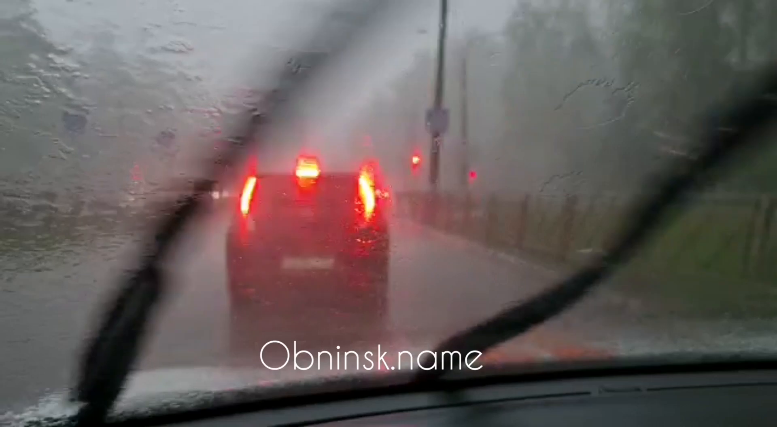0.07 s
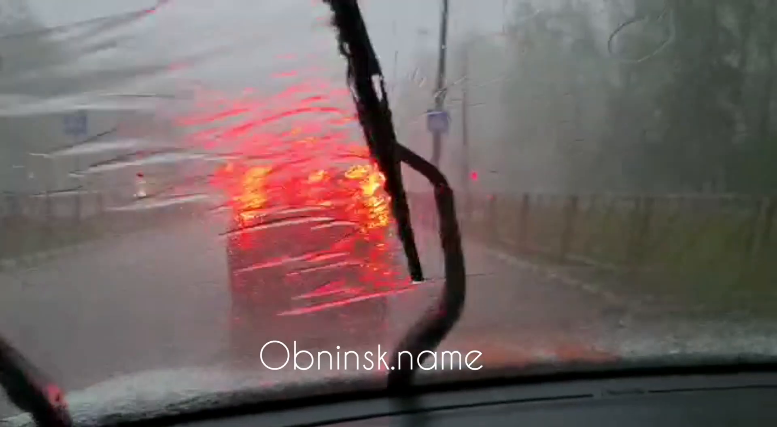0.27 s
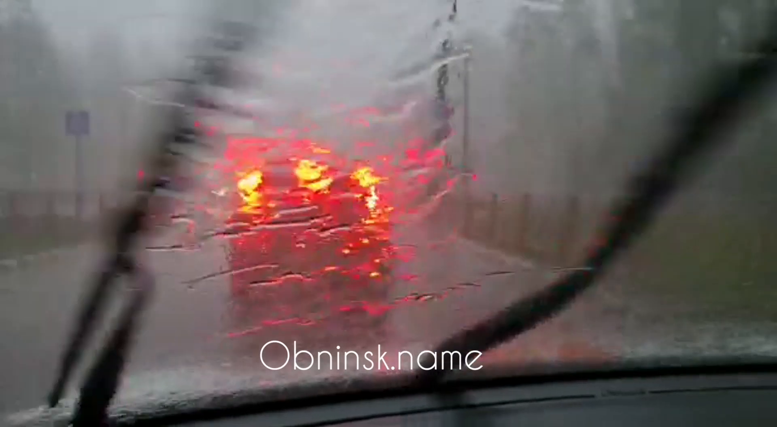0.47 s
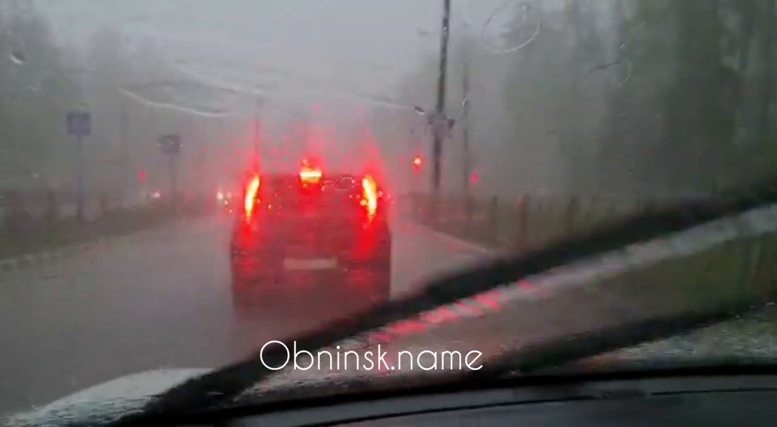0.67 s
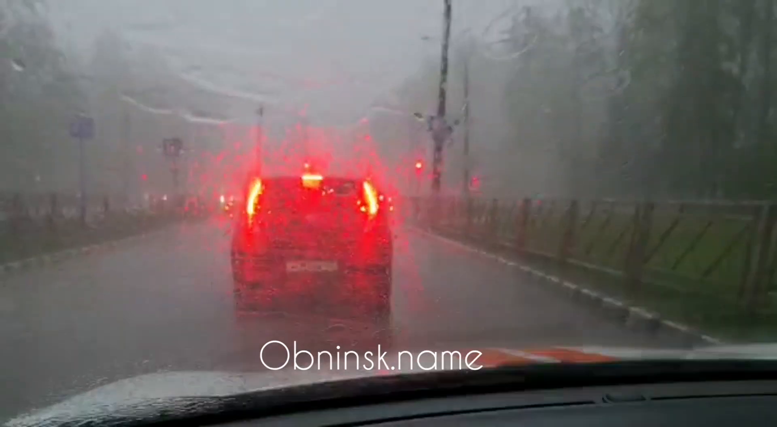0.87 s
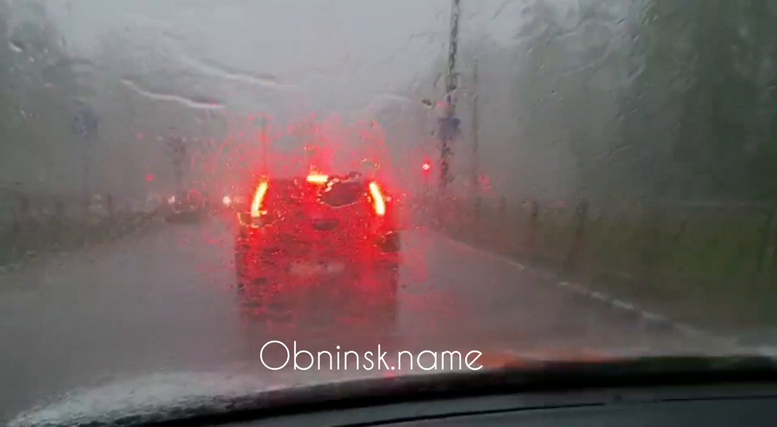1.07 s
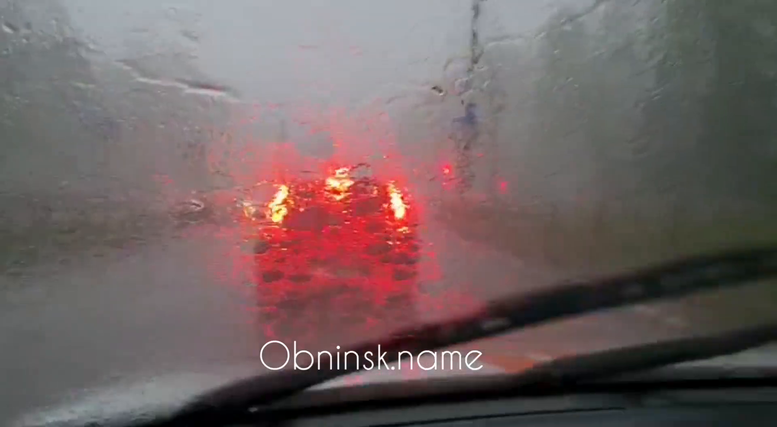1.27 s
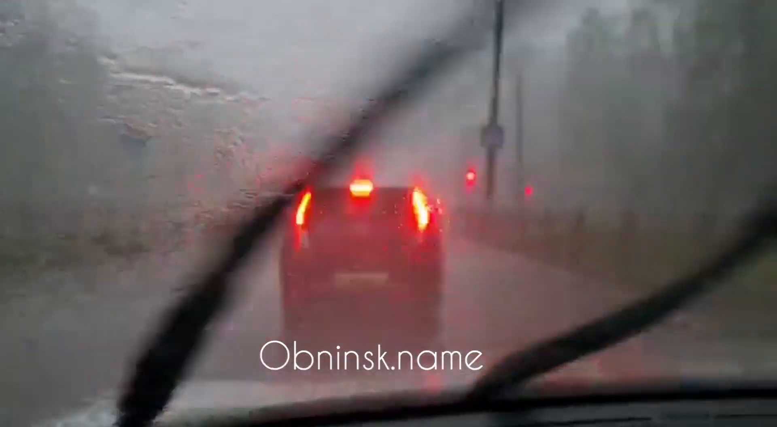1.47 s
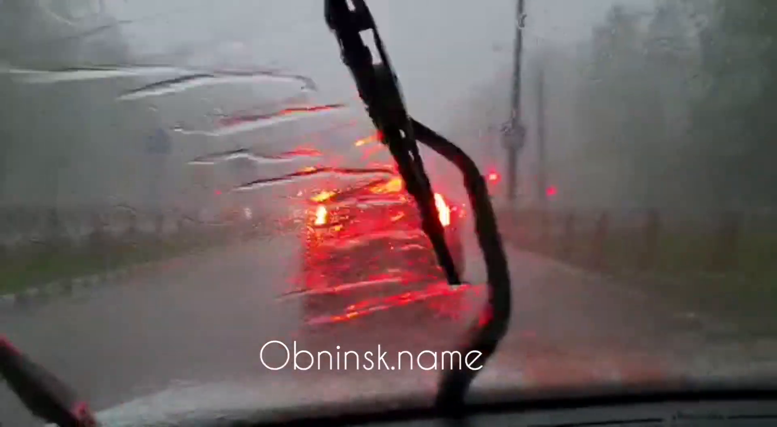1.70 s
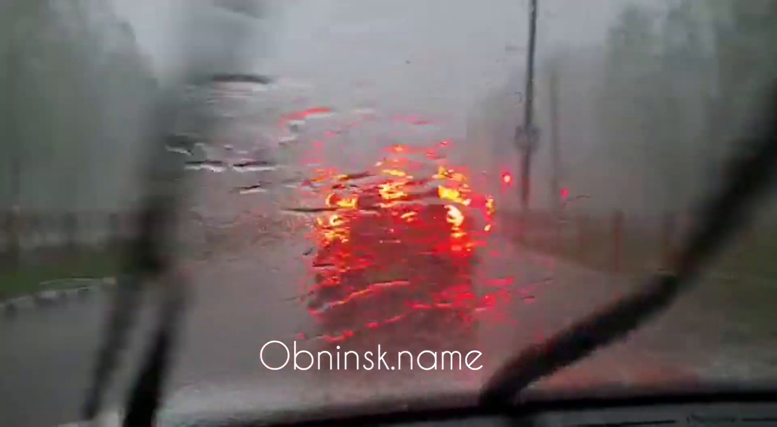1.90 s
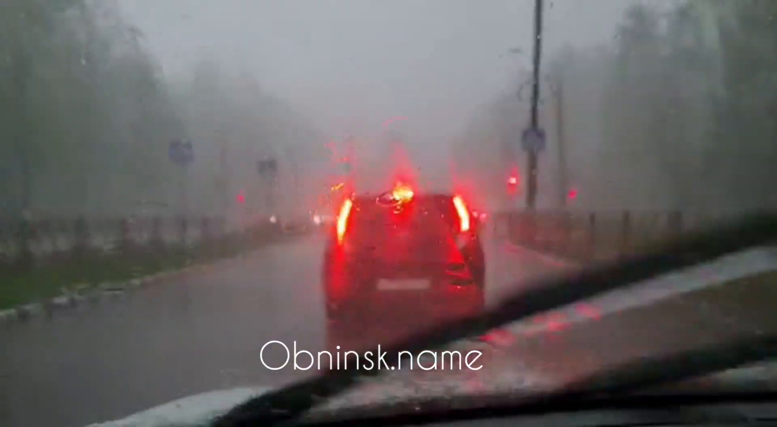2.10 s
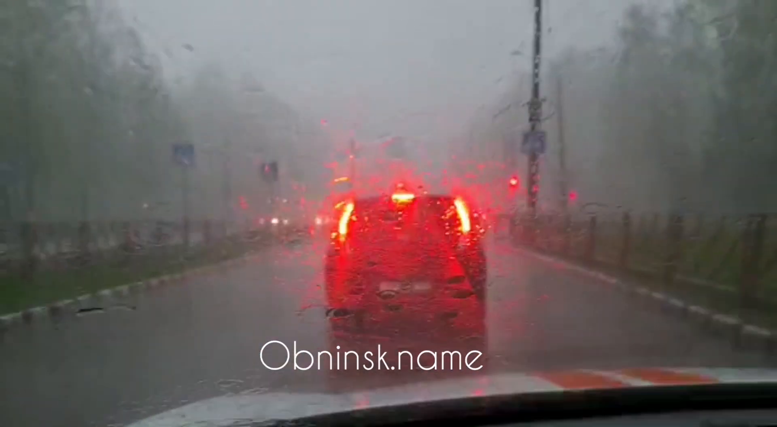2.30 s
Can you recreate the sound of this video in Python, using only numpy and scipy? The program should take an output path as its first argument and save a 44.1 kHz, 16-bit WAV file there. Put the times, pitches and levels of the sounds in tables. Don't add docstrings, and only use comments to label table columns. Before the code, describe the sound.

Rain pounds a car's roof and glass in uneven gusts, strong at first, easing before one second, then swelling again; wipers thump dully over a low idle, captured by two spaced microphones in the cabin.

```python
import sys
import numpy as np
from scipy import signal
from scipy.fft import rfft, irfft, next_fast_len
from scipy.io import wavfile
from scipy.ndimage import uniform_filter1d

SR = 44100
rng = np.random.default_rng(int(sys.argv[2]) if len(sys.argv) > 2 else 0)


def to_wav(s):
    ch = np.atleast_2d(s).T
    pcm = np.round(np.clip(ch, -1, 1) * 32767)
    wavfile.write(sys.argv[1], SR, pcm.astype(np.int16))


def elevation(decibels):
    levels = np.asarray(decibels, float)
    return 10 ** (levels / 20)


N = 103546
LONG = next_fast_len(N + 8000, True)

# start_s [s], roof_force_db [dB], glass_force_db [dB]
GUSTS = [(.07, -27.5, -34.5), (0.189, -28, -37), (.3, -25, -33.5), (.48, -24.5, -41), (.6, -29, -48),
         (0.649, -30, -52.5), (0.751, -35, -52), (.77, -36.5, -61), (.81, -32.5, -59.5), (.93, -42.5, -52),
         (1.019, -30, -34), (1.171, -27.5, -35.5), (1.449, -29.5, -36), (1.62, -31.5, -39), (1.9, -34, -38),
         (2.07, -34, -39.5), (2.199, -32.5, -39.5), (2.35, -36, -46)]
# pitch_hz [Hz], level_db [dB per Hz]
GLASS_TONE = [(400, -17.5), (1000, -6), (1600, 2.5), (2400, -8), (3300, -1), (5000, -11), (7500, -16.5),
              (15700, -21.5)]


def read(points, hz):
    point_hz, value = np.transpose(points)
    return np.interp(np.log(hz + 1), np.log(point_hz + 1), value)


def evened(x):
    return x / np.sqrt(np.mean(x ** 2) + 1e-20)


def through(spectra, tone):
    # pitch_hz [Hz], width_hz [Hz], lift_db [dB]
    panels = [(120.5, 16, 4), (180, 12, 6), (377.4, 48, 7.5), (563, 140, 3.5), (2854, 370, 4.5),
              (8890, 580, 5)]
    # pitch_hz [Hz], likeness [-1 to 1]
    likeness = [(60, 0.95), (180, 0.91), (400, 0.75), (700, -0.0095), (1400, 0.027), (3000, -0.068),
                (15000, 0.0083)]
    # pitch_hz [Hz], left_minus_right_db [dB]
    balance = [(60, -1), (170, 3), (350, 0), (700, -1.5), (1400, -1.6), (2800, -.4), (5500, -1.3),
               (10000, 1.3)]
    hz = np.fft.rfftfreq(LONG, 1 / SR)
    first, second = spectra
    lift_db = sum(db / (1 + ((hz - mid) / (width / 2)) ** 2) for mid, width, db in panels)
    same = np.clip(read(likeness, hz), -1, 1)
    lean = elevation(read(balance, hz) / 2)
    left = first * lean
    right = (same * first + np.sqrt(1 - same ** 2) * second) / lean
    gain = elevation(read(tone, hz) + lift_db) * (hz < 15800)
    return irfft(np.array([left, right]) * gain, LONG)[:, :N]


def rumble():
    # pitch_hz [Hz], level_db [dB per Hz]
    rumble_tone = [(15, -25), (33, 7), (50, 0.5), (120, 0), (200, -1.5), (400, -17), (1000, -60)]
    noise = rng.standard_normal((2, LONG))
    return elevation(-40.5) * evened(through(rfft(noise), rumble_tone))


def engine():
    # pitch_hz [Hz], level_db [dB rms]
    idle = [(23.6, -46), (47.2, -39.5), (71, -60), (94, -60)]
    slow = uniform_filter1d(rng.standard_normal((5, N)), 4000)
    slow = evened(uniform_filter1d(slow, 4000))
    turn_s = np.cumsum(1 + 0.029 * slow[0]) / SR
    lead = np.array([[0.36], [0]])
    total = np.zeros((2, N))
    for (hz, db), waver in zip(idle, slow[1:]):
        strength = np.sqrt(2) * elevation(db + 2.5 * waver)
        total += strength * np.sin(2 * np.pi * (hz * turn_s + rng.random()) + lead)
    return total


def wipers():
    # start_s [s], level_db [dB], pitch_hz [Hz]
    thumps = [(.105, -21, 175), (0.356, -21.5, 60), (0.443, -27.5, 180), (.52, -19, 49.6),
              (0.619, -25.5, 177.6), (1.055, -23.5, 101), (1.071, -22.5, 175), (1.529, -23.5, 172),
              (1.785, -24, 62), (1.79, -24.5, 172.6), (1.901, -26.5, 123), (1.949, -27.5, 50.7)]
    rise_s, t60_s = 0.015, 0.15
    t = np.arange(N) / SR
    total = np.zeros(N)
    for start_s, db, hz in thumps:
        age = np.maximum(t - start_s, 0)
        swell = elevation(db - 60 * age / t60_s) * (1 - np.exp(-age / rise_s))
        total += 2 * swell * np.sin(2 * np.pi * hz * age)
    return total


def splashes(snap_db, count, size=5000):
    # pitch_hz [Hz], t60_s [s]
    ringing = [(100, 0.27), (500, .12), (2000, 0.056), (6000, 0.037), (15000, 0.075)]
    snap_s, spread_s = 0.0015, 0.00048
    noise = rng.standard_normal((count, 2, 5000))
    hz, t, bands = signal.stft(noise, SR, nperseg=128)
    t60_s = np.maximum(read(ringing, hz), 0.005)[:, None]
    fading = bands * elevation(-60 * t / t60_s) / np.sqrt(t60_s)
    tail = signal.istft(fading, SR, nperseg=128)[1]
    age = np.arange(tail.shape[-1]) / SR
    snap = 1 + elevation(snap_db) * np.exp(-age / snap_s)
    sound = tail * snap * (1 - np.exp(-age / spread_s))
    return sound / np.linalg.norm(sound[..., :size], axis=-1, keepdims=True)


def big_drops():
    # start_s [s], peak_db [dB], dullness_db [dB]
    drops = [(.1016, -23, 0), (.154, -24, 0), (.1989, -25, 2), (.2354, -28, 4), (.5235, -25, 1),
             (.5975, -27, -2), (.6528, -31, 6), (.7103, -29, 5), (.7457, -33, 0), (.7772, -31, 0),
             (.819, -31, -2), (.8528, -35, 5), (.9422, -30, 2), (.9672, -31, 0), (.9858, -28, 2),
             (1.004, -25, -2), (1.0738, -21, 0), (1.17, -23, 0), (1.3482, -24, 1), (1.4815, -22, -2),
             (1.6851, -28, 2), (1.7539, -26, 0), (1.8348, -24, -3), (1.8665, -26, 0), (1.8785, -22, -4),
             (1.9218, -26, -8), (1.9565, -29, 10), (2.1365, -26, 0), (2.158, -24, -2), (2.1999, -23, -2)]
    bright, dull = np.zeros((2, 2, LONG))
    sounds = splashes(snap_db=12, count=len(drops), size=130)
    for (start_s, db, dull_db), sound in zip(drops, sounds):
        start = round(start_s * SR)
        at = slice(start, start + sound.shape[1])
        bright[:, at] += elevation(db) * sound
        dull[:, at] += elevation(db + dull_db) * sound
    low = signal.lfilter(*signal.butter(2, 4000, fs=SR), dull)
    high = signal.lfilter(*signal.butter(2, 4000, "high", fs=SR), bright)
    return elevation(32) * through(rfft(low + high), GLASS_TONE)


def patter(per_s, spread_db, tone, force_db):
    thinning = 0.6
    share = elevation(thinning * (force_db - force_db.max()))
    falls = rng.random(N) < share * per_s / SR
    size = elevation(spread_db * np.minimum(rng.exponential(1, N), 4))
    hits = size * falls / np.sqrt(share)
    spot = rng.integers(0, 12, N) == np.arange(12)[:, None]
    answers = rfft(splashes(snap_db=8.5, count=12), LONG)
    wet = (rfft(hits * spot, LONG)[:, None] * answers).sum(axis=0)
    return evened(through(wet, tone)) * elevation(force_db)


def glass_rain():
    start_s, _, glass_db = np.transpose(GUSTS)
    force_db = 7 + np.interp(np.arange(N) / SR, start_s, glass_db)
    return patter(per_s=2000, spread_db=4.5, tone=GLASS_TONE, force_db=force_db)


def roof_rain():
    # pitch_hz [Hz], level_db [dB per Hz]
    roof_tone = [(30, -19), (70, -6.5), (300, -1.5), (600, -2.5), (1000, -6), (3200, -14), (4800, -24.5),
                 (16000, -47.5)]
    start_s, roof_db, _ = np.transpose(GUSTS)
    force_db = 3 + np.interp(np.arange(N) / SR, start_s, roof_db)
    return patter(per_s=2500, spread_db=3, tone=roof_tone, force_db=force_db)


def scene():
    machine = (engine() + wipers()) * elevation([[-0.8], [0.8]])
    return rumble() + machine + big_drops() + glass_rain() + roof_rain()


def band_limit(x):
    return signal.sosfilt(signal.butter(12, 15780, fs=SR, output="sos"), x)


def record(dry):
    start_s, fade_s = 0.0693, 0.00036
    opening = np.clip((np.arange(N) / SR - start_s) / fade_s, 0, 1)
    return band_limit(dry * opening)


dry = scene()
out = record(dry)
to_wav(out)
```